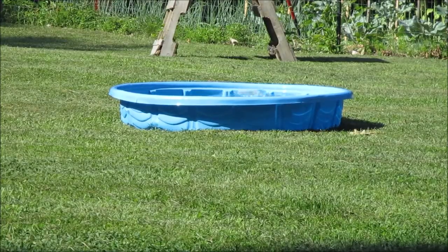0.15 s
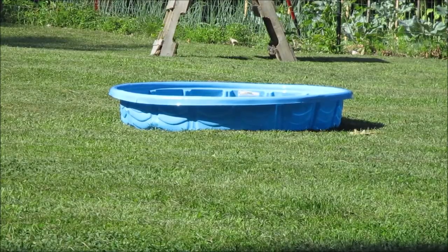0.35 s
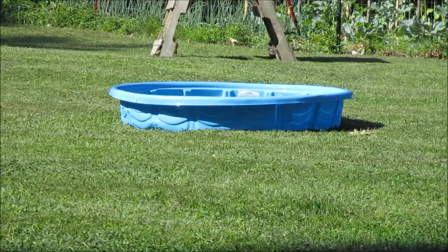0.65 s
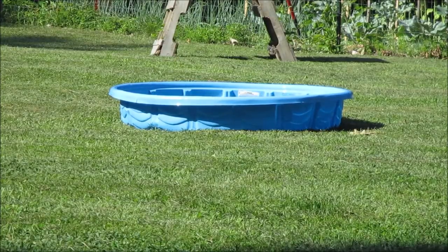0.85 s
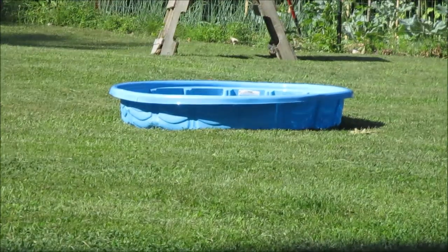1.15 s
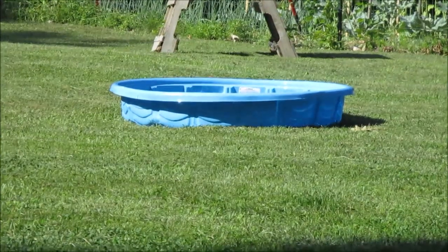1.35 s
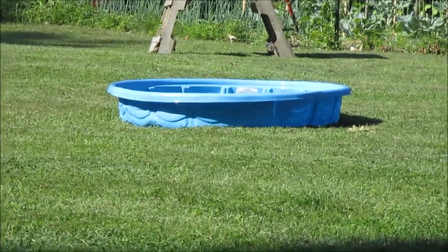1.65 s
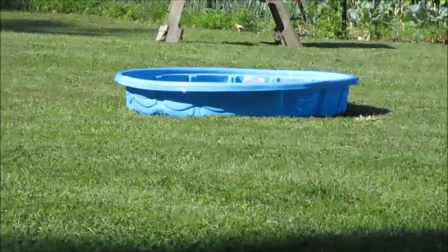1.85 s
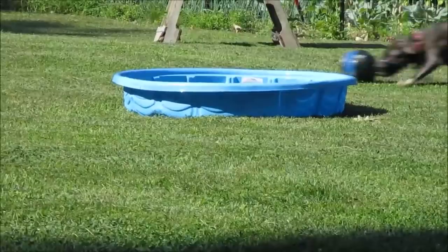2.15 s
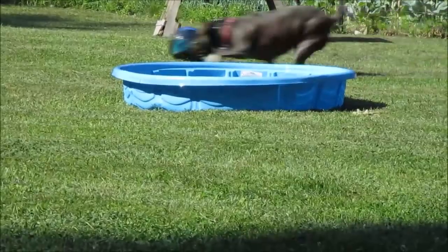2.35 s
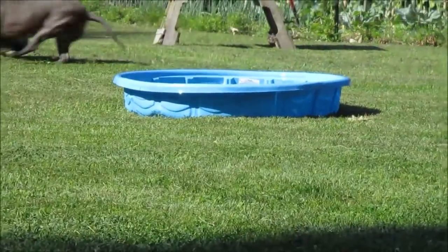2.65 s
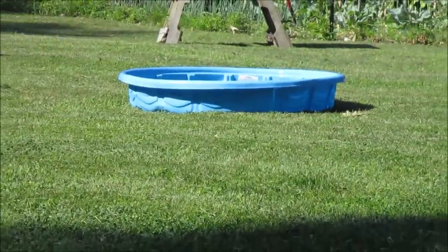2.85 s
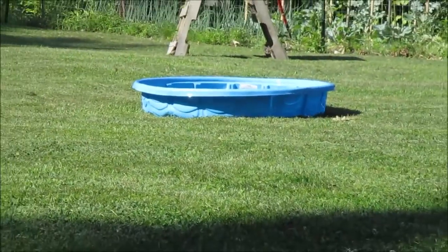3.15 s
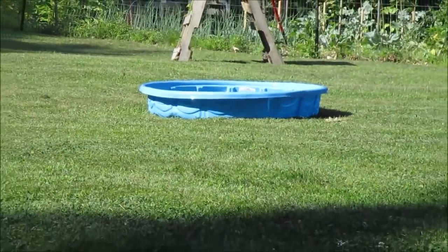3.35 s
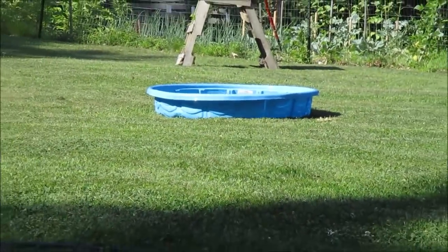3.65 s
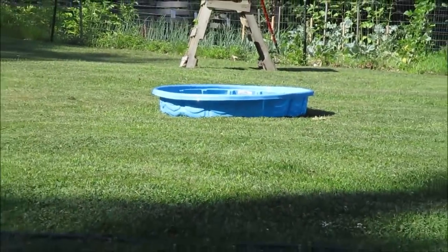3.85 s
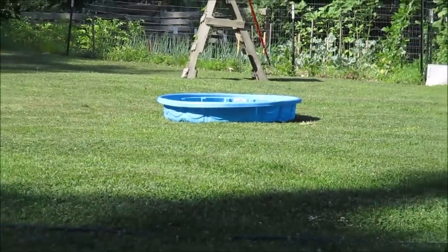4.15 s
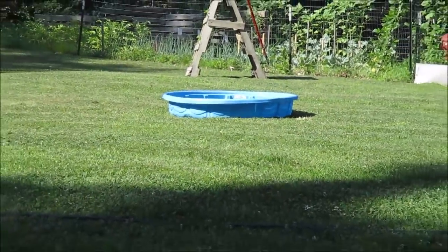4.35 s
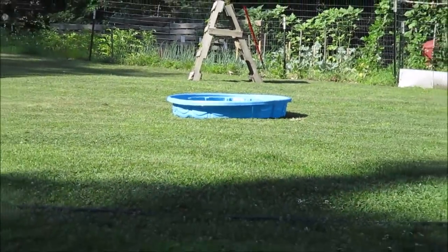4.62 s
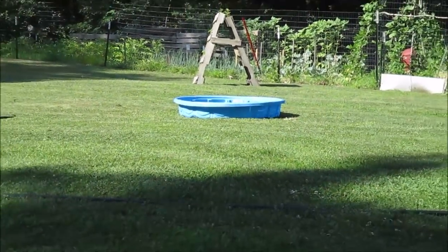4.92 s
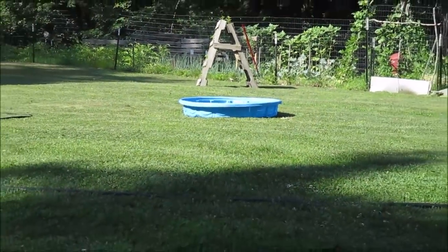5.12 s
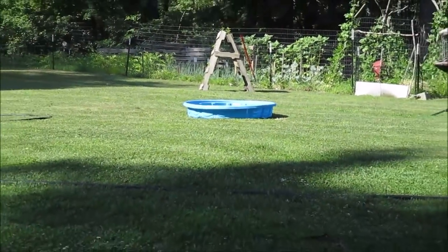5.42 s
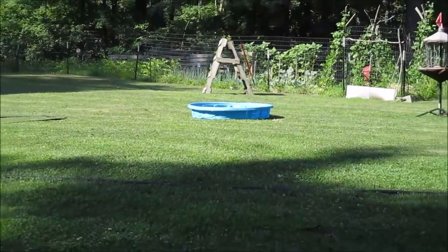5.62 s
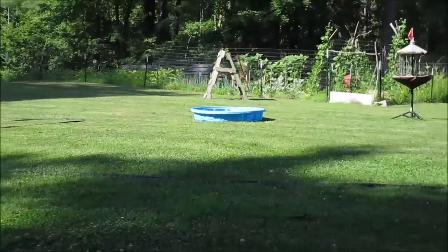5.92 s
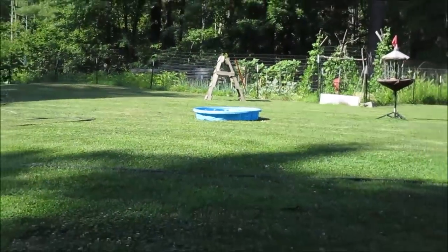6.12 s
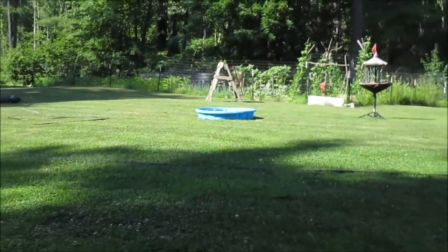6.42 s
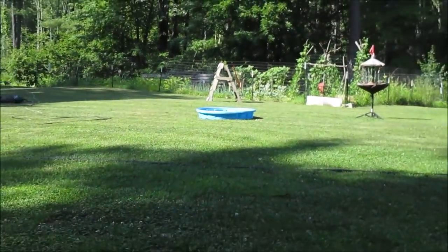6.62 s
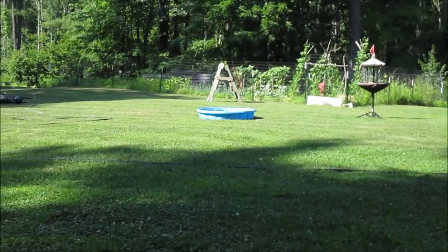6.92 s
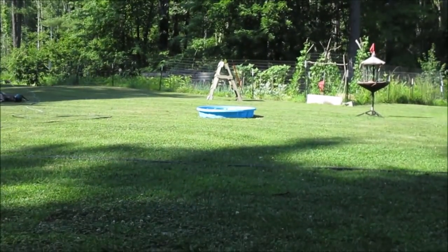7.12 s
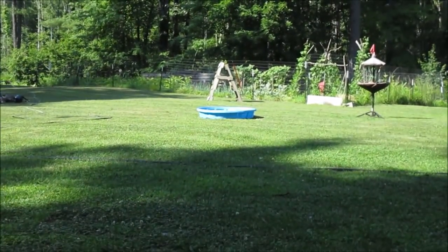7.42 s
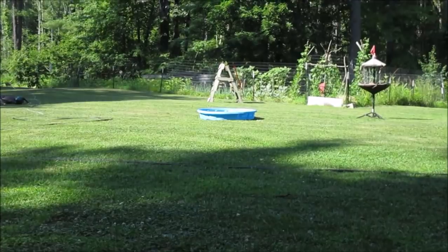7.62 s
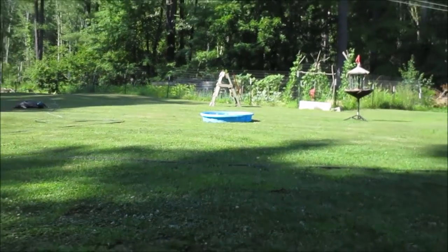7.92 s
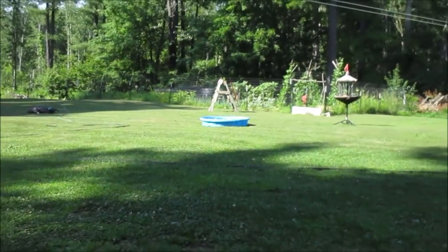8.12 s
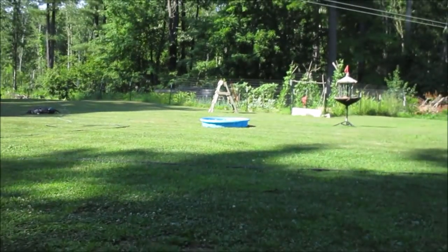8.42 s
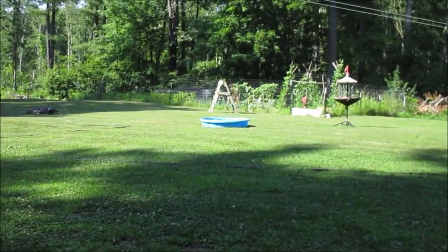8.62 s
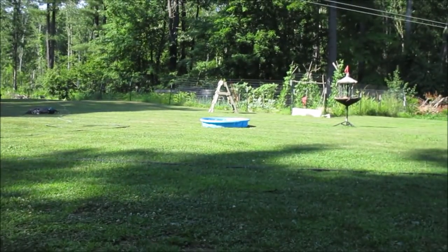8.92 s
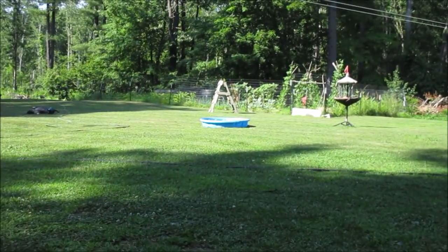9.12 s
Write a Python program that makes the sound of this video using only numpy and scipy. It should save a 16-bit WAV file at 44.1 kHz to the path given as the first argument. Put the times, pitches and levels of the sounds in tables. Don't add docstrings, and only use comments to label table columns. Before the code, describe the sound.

Low garden wind rumble and faint leaf hiss, plastic finger scuffs and lever clicks, then a long ticking, whistling zoom motor ending in a sharp click.

```python
import sys
import numpy as np
from scipy import signal
from scipy.fft import rfft, irfft
from scipy.io import wavfile
from scipy.ndimage import uniform_filter1d

SR = 44100
rng = np.random.default_rng(int(sys.argv[2]) if len(sys.argv) > 2 else 0)


def attenuation_scalar(level_db):
    decades = np.asarray(level_db, float) / 20
    return 10 ** decades


def unload_audio(sound):
    columns = np.transpose(np.atleast_2d(sound))
    steps = np.round(np.clip(columns, -1, 1) * 32767)
    wavfile.write(sys.argv[1], SR, steps.astype(np.int16))


N = 408624
TURN_S = .024
MESH_EDGE_HZ = 12800

# hz, width_hz, level_db
SHELL = [(830, 214, 1.5), (1730, 450, -1.5), (2500, 640, -1), (3010, 310, 1), (4190, 1150, -10.5)]
# hz, width_hz, level_db
SHELL_TOP = [(5760, 2200, -14), (6740, 1460, -1), (8700, 1860, 4), (10530, 3400, 4), (11720, 2000, 4.5),
             (13500, 2100, -10)]


def rms_one(x):
    return x / np.sqrt(np.mean(x ** 2) + 1e-20)


def in_time(rows):
    s, *columns = np.transpose(rows)
    return [np.interp(np.arange(N) / SR, s, c) for c in columns]


def drift(rate):
    r = np.exp(-80 * np.pi * rate / SR)
    slow = signal.lfilter([1], [1, -2 * r, r * r], rng.standard_normal(N // 40 + 2002))[2000:]
    return np.interp(np.arange(N) / 40, np.arange(len(slow)), rms_one(slow))


def resonate(x, peaks):
    out = 0
    for k, (hz, width, db) in enumerate(peaks):
        r = np.exp(-np.pi * width / SR)
        poles = [1, -2 * r * np.cos(2 * np.pi * hz / SR), r * r]
        out = out + (-1) ** k * attenuation_scalar(db) * signal.lfilter([1 - r, 0, r - 1], poles, x + 1e-18)
    return out


def twice(x, peaks):
    out = 0
    for k, (hz, width, db) in enumerate(peaks):
        once = resonate(x, [(hz, width, 0)])
        out = out + (-1) ** k * resonate(once, [(hz, width, db)])
    return out


def ring(clicks, hz, t60):
    r, w = attenuation_scalar(-60 / (t60 * SR)), 2 * np.pi * hz / SR
    return signal.lfilter([0, np.sin(w)], [1, -2 * r * np.cos(w), r * r], clicks + 1e-18)


def steep(x, hz, kind):
    return signal.sosfilt(signal.butter(6, hz, kind, fs=SR, output="sos"), x)


def coloured(spectrum, patchy_db):
    hz, db = np.transpose(spectrum)
    out, white, together = 0, rng.standard_normal((2, N)), drift(0.29)
    edges = hz[0] * 2 ** np.arange(0, np.log2(hz[-1] / hz[0]), 1 / 3)
    for k, (low, high) in enumerate(zip(edges, edges[1:])):
        band = signal.sosfilt(signal.butter(2, [low, high], "band", fs=SR, output="sos"), white[k % 2])
        level_db = np.interp(np.log(low * high) / 2, np.log(hz), db)
        out = out + band * attenuation_scalar(level_db + patchy_db * (together + drift(4.7)))
    return rms_one(out)


def bump(clicks, ms):
    return signal.oaconvolve(clicks, np.hanning(max(3, round(ms * SR / 1000))))[:N]


def scrape(clicks, ms):
    return signal.lfilter([1], [1, -np.exp(-1000 / (ms * SR))], clicks)


def swell(part):
    return np.clip(np.minimum(part / 0.085, (1 - part) / 0.31), 0, 1)


def garden():
    # time_s, above_calm_db
    wind = [(0, 0.5), (.5, 0), (1.0, 0.5), (1.75, 2), (1.85, -1), (2.55, 1), (3.2, -0.5), (4.5, -1),
            (5.3, 0.5), (6.0, 0.5), (7.7, 0), (8.1, 3), (8.6, -1), (9.27, 2)]
    # hz, level_db_per_hz
    air_spectrum = [(15, -56), (25, -3.5), (48, -3), (131, -4), (161, -6), (267, -10), (301, -11.5),
                    (419, -15.5), (525, -13.5), (563, -23.5), (636, -19), (933, -17.5), (1600, -50.5),
                    (2080, -39.5), (3520, -120)]
    # hz, level_db_per_hz
    leaf_spectrum = [(900, 9.5), (1500, 0), (2500, -6), (4000, -9), (8000, -16), (15000, -33)]
    # time_s, firing_speed_hz, load_db
    engine_course = [(0, 84.3, -49), (.8, 85, -59), (1.2, 80.67, -56), (2.2, 78.45, -53.5),
                     (3.0, 79.26, -55), (3.5, 80.7, -54.5), (4.2, 80.6, -50), (5.2, 81.4, -48.5),
                     (5.5, 80.8, -67), (6.5, 80.2, -53), (9.27, 78.66, -56.5)]
    t, (wind_db,) = np.arange(N) / SR, in_time(wind)
    dying_db = 2 * t + 48 * np.clip(t - 1.64, 0, None)
    leaves_db = -55.5 - np.minimum(dying_db, 65 * (9.4 - t))
    traffic_db = -55 + 0.21 * wind_db + np.clip((leaves_db + 92.0) / 8, 0, 1)
    air = coloured(air_spectrum, patchy_db=.5)
    rumble = rms_one(steep(air, 343.8, "low"))
    traffic = rms_one(steep(air, 299.0, "high"))
    leaves = coloured(leaf_spectrum, patchy_db=.4)
    hz, load_db = in_time(engine_course)
    boom_db = 14 * np.exp(-((t - 3.815) / 0.18) ** 2)
    third_db = -60 + 0.74 * (load_db + 51.5) + boom_db
    turn = np.cumsum(2 * np.pi * (hz + 1.214 * drift(3.47)) / SR)
    engine = attenuation_scalar(load_db + 0.42 * drift(3.9)) * np.sin(2 * turn)
    engine = engine + attenuation_scalar(third_db + 3.6 * drift(21.0)) * np.sin(3 * turn)
    return attenuation_scalar(-48 + wind_db) * rumble + attenuation_scalar(traffic_db) * traffic + attenuation_scalar(leaves_db) * leaves + engine


def lever_clicks():
    # start_s, shell_db, top_db, lever_ring_above_shell_db
    cracks = [(0.0614, -64, -56, -14), (0.328, -34, -72, -4), (1.207, -29, -52, -20),
              (1.383, -32, -62, -12), (1.585, -27, -65, -20), (1.659, -33, -72, -20),
              (1.6832, -22, -61, -16), (1.6912, -14, -65, -17), (1.7035, -25, -60, -20),
              (1.7078, -25, -64, -20), (1.7353, -20, -52, -22), (1.7445, -9, -54, -15),
              (1.815, -46, -56, -20), (1.837, -36, -66, -20), (1.8475, -29, -53, -14),
              (2.051, -62, -49, -20), (2.075, -62, -48, -20), (2.1005, -44, -75, -20),
              (2.171, -62, -48, -20), (2.907, -40, -75, -20), (4.911, -41, -75, -20),
              (2.4537, -58, -43, -17), (2.991, -28, -48, -6), (2.994, -32, -45, -14),
              (2.998, -34, -44, -17), (4.3677, -52, -44, -1), (5.0739, -62, -47, -19),
              (6.451, -29, -44, -3), (6.4532, -32, -34, -20), (6.4546, -10.5, -25, -11),
              (6.4562, -22, -33, -18), (6.6747, -47, -54, -8), (6.685, -47, -71, -17),
              (6.7352, -30, -49.5, -10.5), (6.9107, -46.5, -59, 10), (6.921, -44, -62, -20),
              (7.5546, -46, -55, -7), (7.635, -46, -62, -20), (7.655, -38, -54, -20), (7.66, -29, -50, -24),
              (7.69, -33, -48, -20), (7.695, -20.5, -43, -18), (7.72, -39, -70, -20),
              (7.7622, -40, -70, -20), (7.769, -34, -59, -18), (7.777, -40, -66, -16),
              (7.786, -26.5, -66, -11), (8.1095, -46, -50, -20), (8.1145, -44, -47, -20),
              (8.1185, -34, -50, -20), (8.125, -25, -38, -8), (8.1292, -28, -40, -8),
              (8.551, -47, -55, 6.5)]
    # hz, level_db, t60_s
    lever = [(1540, -10.5, 0.044), (2383, -12.5, 0.042), (2560, -17.5, 0.089), (770, -19, 0.016),
             (2884, -25, 0.12), (2300, -20, 0.07), (1710, -9, 0.019), (3400, -38.5, 0.2)]
    shell, top, struck, heavy = np.zeros((4, N))
    t = np.arange(400) / SR
    for s, shell_db, top_db, ring_db in cracks:
        at = round(s * SR)
        crack = rng.standard_normal(400) * t / (t + 0.0013) * np.exp(-t * 1000 / 0.69)
        crack[12] += 1.53
        shell[at:at + 400] += crack * attenuation_scalar(shell_db)
        top[at:at + 400] += crack * attenuation_scalar(top_db)
        struck[at + 30] += attenuation_scalar(shell_db + ring_db)
        heavy[at + 30] += attenuation_scalar(shell_db + ring_db + .6 * min(shell_db + 13, 0))
    rings = sum(attenuation_scalar(db) * ring(struck if hz > 2000 else heavy, hz, t60) for hz, db, t60 in lever)
    dulled = signal.lfilter([1], [1, -0.14], top)
    return attenuation_scalar(11.5) * resonate(shell, SHELL) + attenuation_scalar(25.0) * resonate(dulled, SHELL_TOP) + rings


def pressure():
    # start_s, length_s, shell_db, ring_4khz_db, top_db
    slides = [(1.03, 0.94, -62.5, -67.5, -74), (1.083, 0.11, -56.5, -54.5, -53.5),
              (1.203, 0.049, -55.5, -52, -49), (1.243, 0.058, -52, -52.5, -51.5),
              (1.285, 0.14, -55, -58, -59), (1.465, 0.12, -56, -59.5, -62), (1.684, .012, -50, -60, -62),
              (1.694, 0.054, -43, -47, -48.5), (1.777, 0.05, -55.5, -45.5, -54),
              (1.807, 0.052, -60, -61, -64), (1.845, 0.039, -54, -45, -65), (7.627, 0.016, -58, -70, -59),
              (7.651, 0.029, -47.5, -56, -47.5), (7.689, 0.015, -42, -43, -45.5),
              (7.701, 0.15, -62, -51, -64), (8.111, 0.021, -48, -70, -47), (8.128, 0.13, -72, -84, -59.5),
              (8.948, 0.22, -66.5, -85, -77)]
    # give_s, length_s, shell_db, ring_4khz_db, top_db
    pushes = [
        (1.746, 0.025, -36.5, -35, -37),
        (1.774, 0.025, -41, -35, -38),
        (6.455, 0.004, -29, -49, -28),
        (8.131, 0.0069, -36, -44, -35),
    ]
    out, t = np.zeros((3, N)), np.arange(N) / SR
    for s, length, *db in slides:
        out += np.outer(attenuation_scalar(np.array(db)), swell((t - s) / length) ** 2)
    for s, length, *db in pushes:
        grow = attenuation_scalar(15 * np.clip((t - s) / length, -1, 0)) * (t > s - length)
        give = np.clip((s - t) / 0.0062 + 1, 0, 1) ** 2
        out += np.outer(attenuation_scalar(np.array(db)), grow * give)
    return out


def finger():
    # hz, width_hz, level_db
    skin = [(1770, 102, -8), (2770, 160, -11.5), (5680, 190, -12.5)]
    shell, ringing, top = pressure()
    grains = (rng.random(N) < 14000 / SR) * attenuation_scalar(2.2 * rng.exponential(1, N)) * rng.choice([-1, 1], N)
    body = rms_one(steep(resonate(grains, SHELL[:4] + skin[:2]), 450, "high"))
    middle = rms_one(twice(grains, SHELL[4:]))
    bright = rms_one(resonate(grains, SHELL_TOP + skin[2:]))
    return shell * body + ringing * middle + top * bright


def squeaks():
    # start_s, length_s, hz, width_hz, level_db
    songs = [(1.077, 0.099, 4360, 340, -55), (1.202, 0.13, 2640, 250, -56), (1.291, 0.13, 1630, 90, -56.5),
             (1.296, .1, 5460, 200, -60), (1.692, 0.0042, 4000, 600, -36), (1.703, 0.0048, 4000, 600, -44),
             (1.728, 0.026, 2800, 300, -37), (1.7425, 0.0057, 4030, 700, -24.5),
             (1.757, .018, 1553, 150, -45.5), (1.844, 0.12, 4900, 700, -52.5),
             (1.94, 0.027, 13300, 200, -62), (2.198, .012, 11900, 300, -51),
             (2.206, 0.036, 10170, 400, -49), (2.21, 0.032, 12700, 200, -57),
             (6.452, 0.0069, 4240, 500, -41), (6.49, .022, 4300, 300, -69), (7.722, .022, 6200, 250, -62),
             (7.77, .014, 6200, 350, -49), (7.759, 0.089, 5000, 800, -53), (7.73, 0.039, 8600, 300, -62),
             (8.96, .14, 4170, 149.5, -80), (8.96, .14, 2840, 300, -80)]
    out = np.zeros(N)
    for s, length, hz, width, db in songs:
        tone = rms_one(twice(rng.standard_normal(8000), [(hz, width, 0)]))
        out[round(s * SR):][:8000] += attenuation_scalar(db) * swell(np.arange(8000) / SR / length) * tone
    return out


def thuds():
    # start_s, peak_db, hz, t60_s
    blows = [(1.659, -37, 960, 0.018), (1.703, -31.5, 990, 0.027), (1.733, -35, 1020, 0.036),
             (2.1, -34.5, 646, 0.018), (2.2365, -29.5, 415, 0.024), (2.239, -36, 550, 0.014),
             (2.454, -43, 152, 0.044), (2.907, -29.5, 660, 0.013), (2.985, -22, 94.5, 0.049),
             (2.99, -29.5, 910, 0.021), (2.996, -27, 228, 0.033), (4.254, -44, 405, 0.03),
             (4.519, -44, 466, 0.041), (4.911, -32, 405, 0.015), (4.929, -34, 446, 0.015),
             (5.023, -35.5, 427, 0.024), (5.05, -39, 380.3, 0.016), (5.128, -35, 408, 0.022),
             (5.57, -34.5, 403, 0.015), (6.453, -34.5, 72.7, 0.039), (6.684, -42.5, 750, 0.029),
             (6.7345, -40.5, 740, 0.028), (7.658, -34.5, 200, 0.025), (7.689, -34.5, 265, 0.029),
             (7.74, -47, 423, 0.026), (8.118, -35, 590, .015), (8.123, -36, 725, 0.025),
             (8.126, -33, 1070, 0.025), (8.128, -39, 422, 0.022)]
    out, t = np.zeros(N), np.arange(3000) / SR
    for s, db, hz, t60 in blows:
        puff = resonate(rng.standard_normal(len(t)), [(1070 / 15.0, 1070, 0)])
        puff = rms_one(signal.lfilter([1], [1, -.93], puff))
        fade = t / (t + 0.00039) * attenuation_scalar(-60 * t / t60)
        out[round(s * SR):][:len(t)] += attenuation_scalar(db + 6.0) * fade * (np.sin(2 * np.pi * hz * t) + 0.5 * puff)
    return steep(out + 1e-18, 1140, "low")


def contacts(table, period_s, column, zero_s, lag_ms, jitter_ms, spread_db):
    ms, db = np.array(table)[:, [0, column]].T
    s = (zero_s + period_s * np.arange(5 / period_s)[:, None] + ms / 1000).ravel()
    at = np.clip(s * SR, 0, N - 2)
    late_ms = lag_ms[at.astype(int)] + jitter_ms * rng.standard_normal(len(s))
    at = np.clip(at + late_ms * SR / 1000, 0, N - 2)
    size = attenuation_scalar(np.tile(db, len(s) // len(db)) + spread_db * rng.standard_normal(len(s)))
    return np.bincount(at.astype(int), size, N)


def flanks(turns):
    size, repeats = round(TURN_S * SR), .975
    whole = np.floor(turns).astype(int) % 512
    jitter = .008 * SR / 1000 * rng.standard_normal(512)[whole]
    at = ((turns % 1) * size + jitter).astype(int) % size
    first, second = rng.standard_normal((2, size))
    wear = .7 * TURN_S * turns
    worn = np.cos(wear) * first[at] + np.sin(wear) * second[at]
    return repeats * worn + np.sqrt(1 - repeats ** 2) * rng.standard_normal(N)


def frame_knock(blows, place, barrel_at, turns):
    # hz, width_hz, level_db
    frame = [(1661, 107.6, -6.5), (2200, 274, -2), (2760, 190, -7.5), (2997, 280, -4), (3470, 1530, -16)]
    # hz, width_hz, level_db
    dying = [(3780, 62, -9.5), (3950, 70, 2)]
    # hz, width_hz, level_db
    staying = [(3930, 94, -7)]
    blows = blows + attenuation_scalar(-43) * rng.standard_normal(N)
    blows = blows * (1 - .52 * (place - .3 * barrel_at) * (turns % 1 > .15))
    knock = resonate(blows, frame) + attenuation_scalar(-2.5 - 24 * place) * twice(blows, dying) + twice(blows, staying)
    return rms_one(steep(knock, 1270, "high"))


def coil_whine(swells, turns, since, strained, place, barrel_at, flare_hz):
    # offset_steps, level_db
    chopper = [(-1, -10), (0, -1), (1, -4), (2, -7), (3, -15), (5, -19), (8, -12), (9, -12), (10, -10),
               (15, -12)]
    # hz, width_hz, level_db
    buzz = [(4210, 120, 0), (4380, 200, -3)]
    whistle_hz = 4252
    fresh = np.exp(-since / .5)
    carrier = np.cumsum(2 * np.pi * (whistle_hz + 22 * (1.2 - fresh) * drift(30)) / SR)
    step = 2 * np.pi * 3 * turns + 2.0
    rotor = 0
    for k, db in chopper:
        lean_db = 2.5 * min(k, 2) * fresh * (-0.5 - barrel_at)
        far_db = 2.0 * place * (0 < k < 3) * k
        rotor = rotor + attenuation_scalar(db + lean_db - far_db) * np.sin(carrier + k * step + k * k)
    sweep_hz = 4741 - 480 * ((turns - .005 / TURN_S) % 1)
    above_hz = sweep_hz - whistle_hz + flare_hz + 8 * drift(60)
    loose_db = -12 * place + 6 * strained * (1 - barrel_at)
    rotor = rotor + attenuation_scalar(loose_db) * np.sin(carrier + np.cumsum(2 * np.pi * above_hz / SR))
    rotor = rotor + attenuation_scalar(-11.0) * (1 - 0.55 * fresh) * rms_one(twice(flanks(turns), buzz))
    return rms_one(steep(rotor * (.8 + bump(swells, ms=4.5)), 4120, "high"))


def rolled(x):
    t = np.arange(round(.0075 * SR)) / SR
    glide = signal.chirp(t, 4750, t[-1], 7500) * signal.windows.tukey(len(t), .3)
    return signal.oaconvolve(x, glide)[:N]


def barrel(x, peaks, shifts_db, place):
    out = 0
    for k, (peak, db) in enumerate(zip(peaks, shifts_db)):
        out = out + (-1) ** k * attenuation_scalar(db * (place - .5)) * twice(x, [peak])
    return out


def tooth_mesh(low, high, turns, place, bright_db):
    # hz, width_hz, level_db
    low_rings = [(4830, 310, -2.5), (5190, 630, -2), (5940, 520, -1), (6320, 640, -3), (7116, 570, 1.4)]
    # hz, width_hz, level_db
    high_rings = [(7540, 590, -2), (8600, 880, 1.5), (9880, 1200, 2), (11400, 1050, -2.5), (11650, 840, 4),
                  (13000, 900, 0), (14600, 4600, -20)]
    low_shift = [8, -3, -4, 8, -8.5]
    high_shift = [-3, 7, -3.5, 8, -1.5, -2]
    low = rolled(3 * low + flanks(turns) * (.08 + .15 * scrape(low, ms=.5)))
    high = 3.5 * high + flanks(turns) * (.2 + .45 * scrape(high, ms=.8))
    dull = rms_one(barrel(low, low_rings, low_shift, place))
    bright = steep(barrel(high, high_rings[:6], high_shift, place), MESH_EDGE_HZ, "low")
    bright = rms_one(bright + twice(high, high_rings[6:]))
    dip_hz = 6000 - 380 * np.cos(2 * np.pi * (turns - .015 / TURN_S)) + 10 * drift(40)
    shaft = np.sin(np.cumsum(2 * np.pi * dip_hz / SR))
    return attenuation_scalar(-6.5) * dull + attenuation_scalar(bright_db) * bright + attenuation_scalar(-12 - 2.5 * place) * shaft


def proud_snap(zero_s, lag_ms, place):
    # offset_ms, ring_8khz_db, ring_12khz_db, ring_10khz_db
    proud = [(12.0, -9, -16, -3), (15.5, -20, -11, -14), (36.4, -2, -5, -11), (60.0, -15, -18, -2),
             (84.0, -12, -17, -11), (87.3, -15, -6, -18), (108.0, -9, -17, -8), (132.1, -10, -15, -2),
             (156.1, -5, -17, -8), (171.0, -16, -11, -14), (180.0, -15, -16, -10), (204.0, -6, -15, -10),
             (207.3, -15, -11, -16), (228.1, 0, 0, 0), (251.9, -5, -13, -9)]
    first, second, third = [contacts(proud, TURN_S * 11, column, zero_s, lag_ms, jitter_ms=.04, spread_db=1.5)
                            for column in (1, 2, 3)]
    snap = attenuation_scalar(35 + 7 * np.minimum(2 * place, 1)) * twice(first, [(8050, 1100, 0)])
    snap = snap + attenuation_scalar(-4 * place) * twice(second, [(12000, 1400, 45)])
    snap = steep(snap, MESH_EDGE_HZ, "low")
    return snap + attenuation_scalar(39.5 - 9.0 * place) * twice(third, [(10350, 1500, 0)])


def motor(run, zero_s, barrel_at):
    # offset_ms, knock_db, whine_db, low_mesh_db, high_mesh_db
    pinion = [(.9, 0, -3, -2, -3), (5.2, -17, 0, 0, -9), (8.9, -2, -1, -3, -7), (11.9, -15, -3, 0, -6),
              (15.1, -20, -4, -9, -8), (16.9, -7.5, 0, -2, -7), (21.3, -18, 0, 0, -8)]
    # running_db, full_strain_db, travel_db_per_s, coasting_step_db
    layers = [
        (-61.5, 5, -0.7, 0),
        (-59.5, 18, -0.42, 2),
        (-54.5, -4, 0, -2),
        (-2.5, 8.5, 0.33, 5),
    ]
    start, let_go, stop, strain, slack_ms = run
    t = np.arange(N) / SR
    since = np.clip(t - start, 0, None)
    strained = strain * np.exp(-since / 0.089)
    coasting = np.clip((t - let_go) / 0.068, 0, 3)
    knock_db, whine_db, mesh_db, bright_db = [
        db + up_db * strained + per_s * since + step_db * np.minimum(coasting, most)
        for (db, up_db, per_s, step_db), most in zip(layers, (3, 1, 1, 1))]
    place = np.clip(barrel_at + since / 4.9, 0, 1)
    whine_db = whine_db - 7.058 * barrel_at
    knock_db = knock_db - 4.5 * barrel_at
    lag_ms = -slack_ms * np.exp(-since / .55) + .07 * drift(5) + .04 * drift(20)
    seated = 1 - np.clip(slack_ms, 0, 1) * np.exp(-(since / 0.27) ** 4)
    turns = (t - zero_s - lag_ms / 1000) / TURN_S
    flare_hz = 12.0 * (1 - barrel_at) * np.clip(whine_db + 54.5, 0, 12)

    def tooth(column, jitter_ms, spread_db):
        return contacts(pinion, TURN_S, column, zero_s, lag_ms, jitter_ms, spread_db)

    knock = frame_knock(tooth(1, jitter_ms=.03, spread_db=.7), place, barrel_at, turns)
    swells = tooth(2, jitter_ms=.05, spread_db=.5)
    whine = coil_whine(swells, turns, since, strained, place, barrel_at, flare_hz)
    low, high = [tooth(column, jitter_ms=.008, spread_db=.7) for column in (3, 4)]
    mesh = tooth_mesh(low, high, turns, place, bright_db - 1.5 * (1 - seated))
    gears = mesh + seated * proud_snap(zero_s, lag_ms, place)
    on = np.clip(since / 0.0018, 0, 1) * np.clip((stop - t) / 0.011 + 1, 0, 1) ** 2
    waking = attenuation_scalar(-57) * np.clip((t - start) / 0.042 + 1, 0, .25) * 4 * (t < start)
    return on * (attenuation_scalar(knock_db) * knock + attenuation_scalar(whine_db) * whine + attenuation_scalar(mesh_db) * gears) + waking * whine


def taps():
    # start_s, level_db
    tap_times = [
        (3.0577, -26),
        (3.0897, -22.5),
        (3.1365, -21),
    ]
    # hz, level_db, t60_s
    tap_rings = [(8600, -0.5, 0.0048), (9400, -2.5, 0.004), (5800, -14, 0.0051), (4420, -17, 0.0057),
                 (2170, -15, .006), (12700, -16, .002), (7660, -11, 0.0027), (3160, -19, .003),
                 (373, -4, 0.0098), (800, -8, 0.008)]
    s, db = np.transpose(tap_times)
    blow = bump(np.bincount((s * SR).astype(int), attenuation_scalar(db), N), ms=.1)
    return sum(attenuation_scalar(level_db) * ring(blow, hz, t60) for hz, level_db, t60 in tap_rings)


def scene():
    # start_s, lever_let_go_s, stop_s, starting_strain_0_to_1, slack_ms
    runs = [
        (1.845, 6.45, 6.498, .9, 2.5),
        (7.764, 8.125, 8.173, 1, -0.5),
    ]
    wheel_zero_s = (3.6 - 7 * .264, 7.7126 - .264)
    barrel_at = (0.0, 0.66)
    lens = sum(motor(*run) for run in zip(runs, wheel_zero_s, barrel_at))
    return (garden() + lever_clicks() + finger() + squeaks() + thuds() + lens + taps())[None]


def starve(x):
    # centre_s, from_hz, share_of_lines_kept
    starved = [(0.482, 3540, 0.075), (.535, 6000, 0.16), (1.286, 1200, 0.61), (2.223, 1300, 0.4),
               (2.626, 1500, 0.73), (4.864, 1490, 0.99), (5.356, 1500, 0.68), (6.615, 2500, .2),
               (6.655, 3000, 0.52), (6.977, 2200, 0.13), (7.02, 2200, 0.22), (7.127, 2200, 0.31),
               (7.177, 2300, 0.12), (7.32, 2300, 0.29), (7.361, 2200, 0.27), (7.746, 1500, 0.82),
               (7.746, 5800, .07), (8.342, 2000, 0.16), (8.47, 2003, 0.17), (8.812, 2280, 0.31),
               (8.984, 3040, 0.19)]
    out, window, hz = x.copy(), np.hanning(2048), np.fft.rfftfreq(2048, 1 / SR)
    for s, edge_hz, kept in starved:
        at = round(s * SR) - 1024
        lines = rfft(x[at:at + 2048] * window)
        tops = uniform_filter1d(abs(lines) / uniform_filter1d(abs(lines), size=120), size=5)
        lost = (hz > edge_hz) & (tops < np.quantile(tops[hz > edge_hz], np.clip(1 - kept, 0, 1)))
        out[at:at + 2048] -= irfft(lines * lost) * np.minimum(1.5 * window ** .1, 1)
    return out


def low_pass(x):
    return signal.sosfilt(signal.butter(12, 16480, fs=SR, output="sos"), x)


def record(dry):
    # hz, level_db_per_hz
    hiss_spectrum = [(880, -59), (1500, -22), (1850, -7), (2120, 1), (2320, -6.5), (3770, -18), (4330, -29),
                     (6830, -7), (7390, -8), (13400, -13.5), (16000, -24)]
    hiss = attenuation_scalar(-69.5) * coloured(hiss_spectrum, patchy_db=.2)
    x = starve(.3 * np.tanh(dry[0] / .3) + hiss)
    x = signal.sosfilt(signal.ellip(8, .5, 30, 15770, fs=SR, output="sos"), x)
    return low_pass(x[None])


dry = scene()
out = record(dry)
unload_audio(out)
```